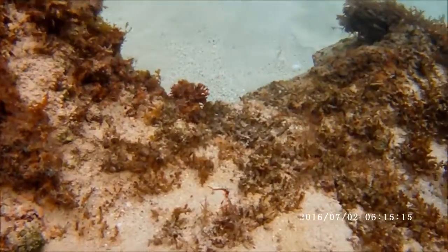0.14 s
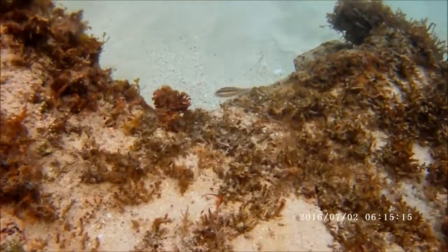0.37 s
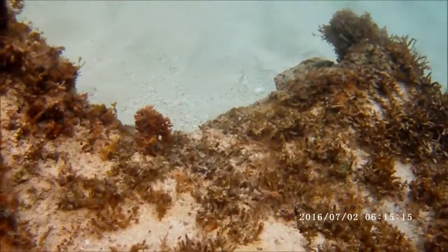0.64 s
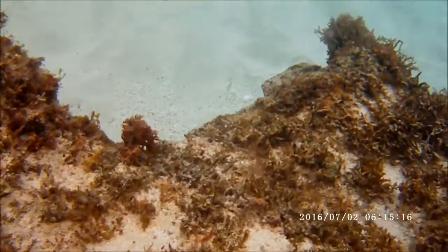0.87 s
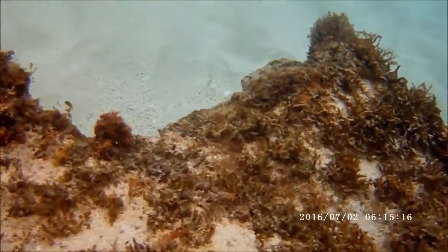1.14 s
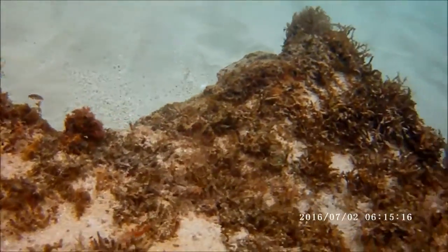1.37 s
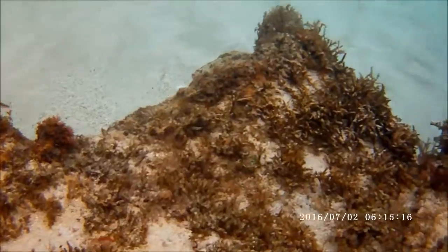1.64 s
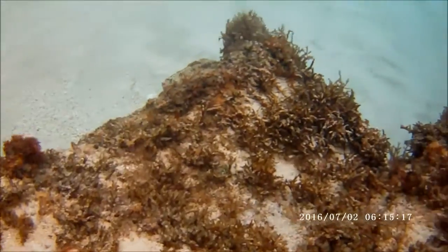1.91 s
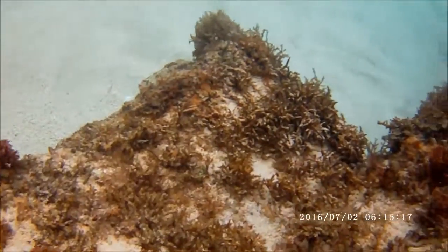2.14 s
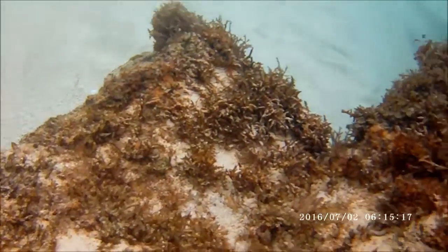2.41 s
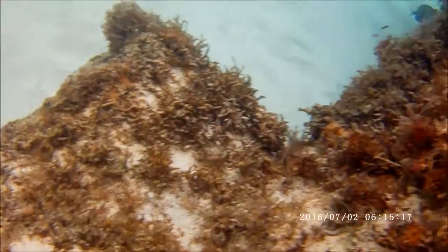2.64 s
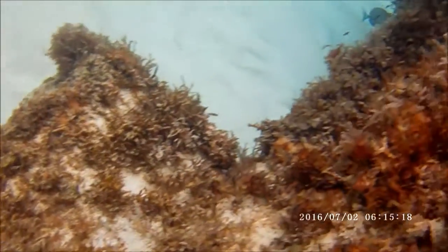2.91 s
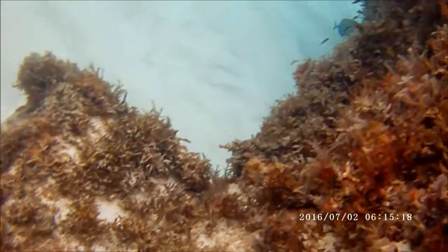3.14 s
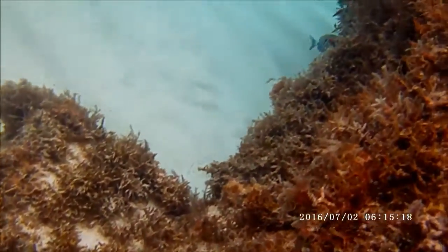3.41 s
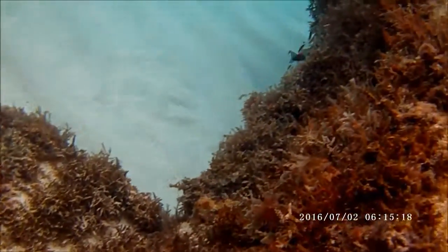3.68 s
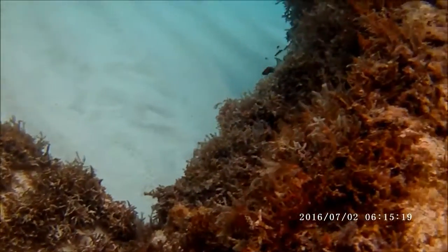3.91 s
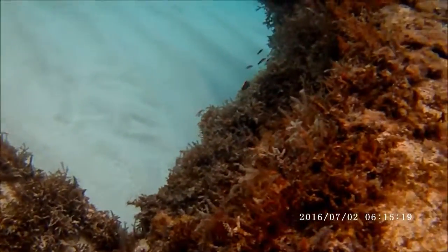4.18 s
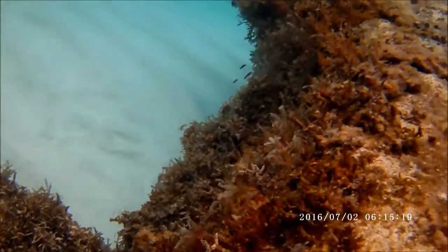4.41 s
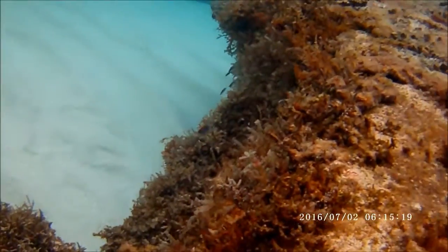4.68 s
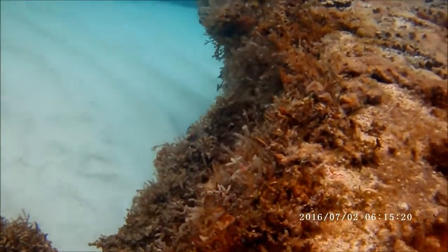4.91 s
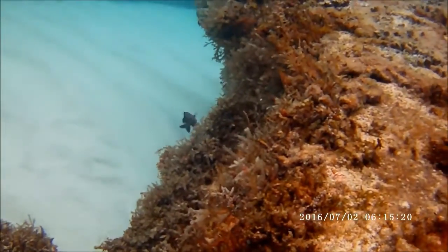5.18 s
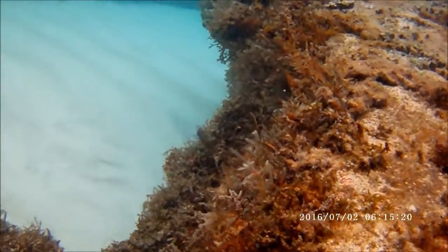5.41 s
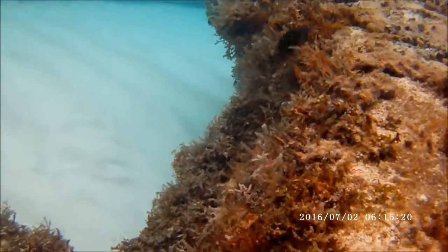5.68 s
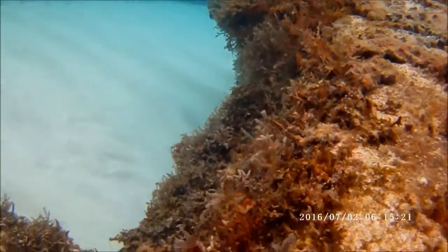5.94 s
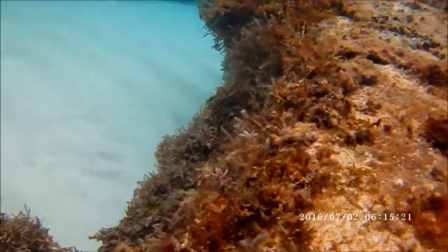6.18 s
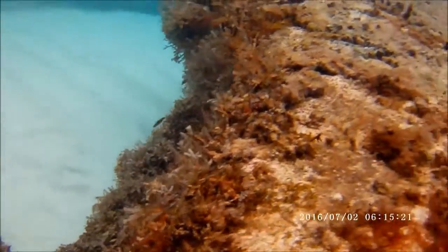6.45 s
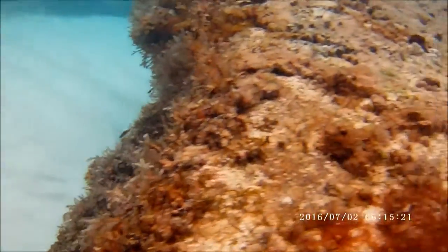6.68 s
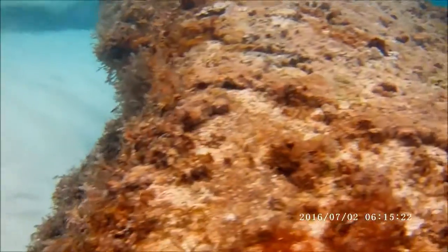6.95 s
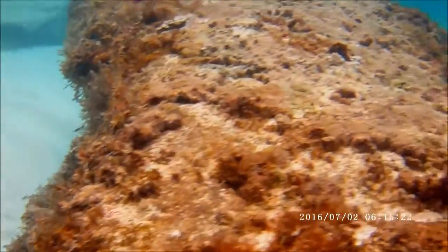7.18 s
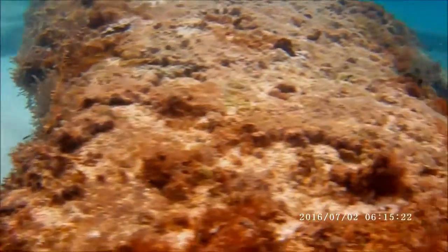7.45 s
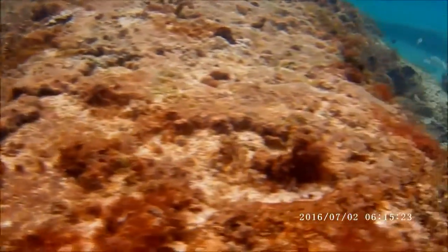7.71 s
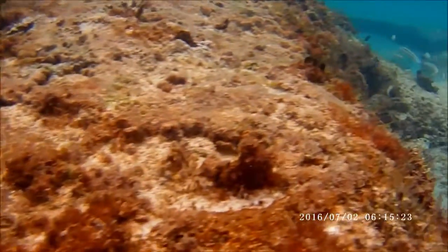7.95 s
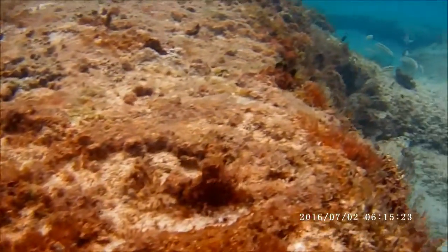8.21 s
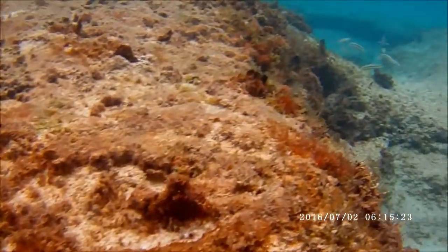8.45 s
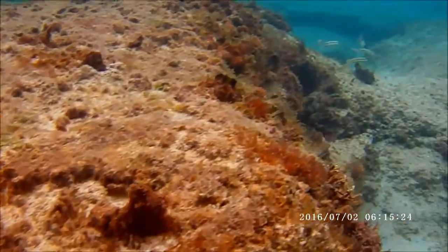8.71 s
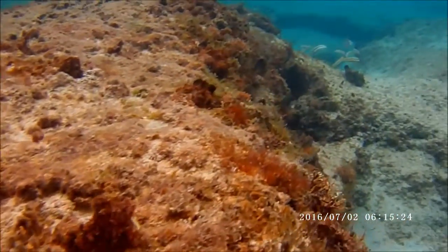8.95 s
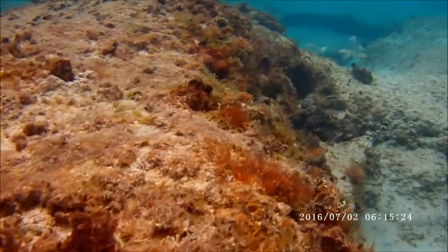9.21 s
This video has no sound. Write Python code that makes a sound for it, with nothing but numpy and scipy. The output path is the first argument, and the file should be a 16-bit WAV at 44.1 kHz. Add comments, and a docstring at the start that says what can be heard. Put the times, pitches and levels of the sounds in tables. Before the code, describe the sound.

Heard from inside a sealed plastic camera housing on a shallow reef. From 0 s there is a faint grainy hum, fine distant crackle and soft smooth hiss; the hum sinks after about 1 s and later returns in weak swells. Irregular snapping shrimp give tiny sharp clicks, with clearer ones near 0.8, 0.9 and 1.2 s, then a sparser stretch. A ringing snap comes at 2.75 s, a small double click at 3.1 s and a bright, hard crack at 4.07 s. At 5.4 s a very faint finger rub leads to the loudest hollow knock at 5.47 s, another at 5.6 s, a bright snap at 5.78 s, and smaller knocks at 5.9, 6.15 and 6.63 s, all dying almost instantly. From 7 s, thin ticks and light snaps scatter over the hiss, with a small cluster around 8.3 s and a crisp tick at 8.8 s, then quiet crackle to about 9.3 s.

```python
"""A grainy hum, a fine crackle and a soft hiss come first; sharp snaps and thin ticks soon stand out.
Snapping shrimp on a shallow reef are heard by a camera sealed in a plastic housing.
Each snap rings the housing: wall tones near 1.2 and 1.7 kHz, lid tones, a bright crack near 6 kHz.
Far snaps blur into the crackle; a hand rubs and knocks the case, and knocks ring the walls too.
The walls hum with grainy noise; preamplifier and water make the hiss, which is shaped random noise."""
import sys
import numpy as np
from scipy import signal
from scipy.fft import rfft, irfft
from scipy.io import wavfile

SR = 44100
rng = np.random.default_rng(int(sys.argv[2]) if len(sys.argv) > 2 else 0)


def how_loud(loudness_db):
    """Turn decibels into a plain amplitude multiplier (0 dB gives 1, 20 dB gives 10)."""
    steps = np.asarray(loudness_db, float) / 20
    return 10 ** steps


def master(y):
    """Save y as 16-bit WAV."""
    cut = np.clip(np.atleast_2d(y).T, -1, 1)
    pcm = np.round(cut * 32767)  # scale
    wavfile.write(sys.argv[1], SR, pcm.astype(np.int16))


N = 411892  # length of the scene in samples

# All source levels below hold ahead of the bass cuts.
# near snaps, and the upper ringing of knocks on the case, peak levels:
# (t/s, low wall level/dB, high wall level/dB, lid level/dB, crack level/dB)
SNAPS_AND_KNOCK_RINGING = [(0.0961, -53.5, -49, -45.5, -41), (0.1291, -49.5, -54, -42, -45),
                           (0.1852, -54, -45, -47, -46), (0.7615, -42, -36, -45.5, -42.5),
                           (0.779, -75, -51, -52, -55), (0.936, -49, -38, -44, -32),
                           (0.9697, -74, -56, -52, -55), (1.0299, -66, -49, -68, -61),
                           (1.1224, -78, -49, -49.5, -50), (1.132, -59, -46, -57, -60),
                           (1.2008, -40.5, -32, -31, -32), (1.2066, -46, -45, -49, -54),
                           (1.5272, -60, -53, -54.5, -51.5), (1.5922, -54, -40, -54, -47.5),
                           (1.6932, -56, -52, -75, -74), (1.7102, -55, -53, -44, -47.5),
                           (1.85, -68, -51, -62, -40), (2.0729, -57, -48.5, -66, -59),
                           (2.124, -57, -52.5, -70, -62), (2.1921, -52, -60, -79, -64),
                           (2.259, -58, -52.5, -61, -57), (2.7022, -44, -34, -46, -42.5),
                           (2.75, -32.5, -36, -28.5, -32.5), (3.095, -67, -65, -53, -57),
                           (3.1043, -37, -32.5, -54, -55), (3.1068, -39, -30, -47.5, -53),
                           (3.2175, -55, -52, -51, -47), (3.4218, -54.5, -58, -71, -58),
                           (3.5776, -54.5, -56, -56, -74), (3.6195, -58, -53, -49, -47),
                           (3.6341, -59, -52, -44.5, -39.5), (4.067, -31.5, -17.5, -29, -24),
                           (4.0717, -34, -31, -29, -29), (4.1085, -57, -55, -58, -58),
                           (4.1601, -46, -36, -45, -41.5), (4.441, -44, -47.5, -58, -62),
                           (4.5266, -70, -51.5, -72, -77), (4.5706, -55, -50, -68, -46.5),
                           (4.6262, -43.5, -46.5, -52.5, -53), (5.0574, -48.5, -51, -49.5, -61),
                           (5.0591, -54, -53.5, -62, -47.5), (5.4743, -12.5, -16, -30.5, -38),
                           (5.5299, -58, -53, -51, -47), (5.6038, -14, -28, -32.5, -34.5),
                           (5.7829, -37, -18.5, -29.5, -23.5), (5.8283, -45, -32, -42, -40),
                           (5.891, -30.5, -34.5, -44.5, -46.5), (5.895, -33, -49, -67, -52),
                           (6.049, -76, -51, -55, -48.5), (6.066, -58, -54, -56, -52.5),
                           (6.1453, -29.5, -37, -42.5, -42.5), (6.1818, -54, -58, -48.5, -50),
                           (6.1886, -49, -57, -70, -73), (6.5484, -46, -54, -38, -38.5),
                           (6.6291, -22, -27.5, -43, -48), (6.6712, -83, -52, -63, -48.5),
                           (6.8543, -62, -57.5, -55, -54), (7.228, -64.5, -59.5, -47, -42.5),
                           (7.6158, -56, -63, -50.5, -40.5), (7.7684, -49.5, -53, -48.5, -48),
                           (7.9906, -54.5, -58, -56, -53), (8.0452, -69, -55, -48.5, -45.5),
                           (8.1058, -55, -51.5, -73, -63), (8.2818, -43.5, -33, -45, -48),
                           (8.345, -57, -59, -63, -32.5), (8.3745, -58, -48, -79, -77),
                           (8.3905, -35, -43, -40.5, -55), (8.4506, -55, -47, -42.5, -35)]
# thin ticks, almost all crack: (t/s, crack peak level/dB)
THIN_TICKS = [(0.0617, -51), (0.161, -61), (0.2826, -48), (0.465, -54.5), (0.6263, -49), (0.8512, -54),
              (0.8622, -49), (1.007, -45.5), (1.643, -57), (1.76, -54.5), (1.8763, -49.5), (1.981, -54),
              (2.057, -52), (2.346, -54.5), (2.4398, -54), (2.566, -47), (2.9875, -51), (3.089, -46.5),
              (3.134, -46), (3.169, -49), (3.226, -56), (3.3125, -53), (3.6076, -46), (3.659, -49),
              (3.742, -51), (3.748, -52), (3.819, -50.5), (3.962, -51.5), (4.3058, -53), (4.48, -44),
              (4.5487, -47), (4.556, -53), (4.729, -50), (4.802, -52), (4.8645, -49), (4.9232, -53.5),
              (5.0504, -51), (5.0772, -46), (5.119, -51.5), (5.337, -54), (5.3551, -54), (5.3706, -57),
              (5.417, -42.5), (5.527, -47.5), (5.5637, -50.5), (5.6813, -53), (5.6927, -49.5),
              (5.7566, -53), (5.9116, -50), (6.0136, -55), (6.196, -57), (6.232, -54), (6.783, -49.5),
              (6.787, -53), (6.88, -52), (7.0708, -47), (7.2067, -47.5), (7.217, -53), (7.2796, -52),
              (7.311, -51.5), (7.514, -47), (7.609, -55), (7.6615, -44), (7.6972, -50.5), (7.7657, -42.5),
              (7.819, -51), (7.9545, -49), (8.1595, -52.5), (8.2409, -48.5), (8.3103, -51), (8.5264, -53),
              (8.5961, -44.5), (8.6785, -46), (8.7495, -53.5), (8.8024, -32), (8.918, -54.5), (8.958, -55),
              (8.9925, -42), (9.0663, -55), (9.1864, -52.5)]
# how a tick stirs low wall, high wall and lid, before scatter: (level/dB relative to its crack)
TICK_BODY = (-30, -25.5, -15)
# dull, low part of blows on the case: (t/s, peak level/dB)
CASE_KNOCKS = [(3.1049, -50), (3.1064, -35.5), (5.4756, -26), (5.6048, -24.5), (5.886, -48), (5.8922, -36),
               (5.8945, -38), (6.1456, -40), (6.186, -47), (6.188, -59), (6.6319, -47), (8.391, -51.5)]
# short jerks of a finger dragging on the case, at their strongest: (t/s, level/dB)
FINGER_JERKS = [(5.393, -56), (5.404, -55), (5.415, -59), (5.43, -56), (5.441, -61), (5.459, -60.5)]
# tones of each part of the housing, before any scatter or detuning:
# (f/Hz, relative level/dB, time to fade by 60 dB t/s)
LOW_WALL_TONES = [(1247.5, 1, 0.022), (1088, -8.5, 0.0089), (1440, -14, 0.037)]
HIGH_WALL_TONES = [(1723, -0.5, .018), (1465, -21.5, .03), (1750, -14.5, 0.0085)]
LID_TONES = [(1980, 8.5, 0.0084), (2282, -2.5, 0.018), (2530, -13, 0.014), (3080, -5, 0.017),
             (3435, -5.5, 0.012), (4046, -7.5, 0.01)]
PORT_TONES = [(4470, -11, 0.0049), (5130, -2.5, 0.0073), (5690, -1, 0.0059), (6174, 3, 0.0065),
              (7060, -2.5, 0.0062), (7830, -36, 0.0043), (8860, -27, 0.0024), (10300, -32.5, 0.0007),
              (11600, -29, 0.0029), (14900, -41, .002)]
CASE_TONES = [(423, -11, 0.028), (510, -0.5, 0.018), (624, -6, 0.018), (944, -1.5, 0.022),
              (1095, 5.5, 0.012)]
# slow course of the backgrounds, hum before its resting level is removed and the walls are weighted:
# (t/s, wall hum level/dB, far crackle level/dB)
BACKGROUND_LEVELS = [(0.0, -61.5, -69), (0.6, -62.5, -73.5), (1.22, -70, -76), (2.18, -72, -75.5),
                     (2.9, -68.5, -74.5), (3.66, -88, -74.5), (4.6, -67.5, -72.5), (4.9, -77, -75.5),
                     (5.33, -72, -73), (5.59, -63.5, -75), (5.85, -73, -72.5), (7.25, -72, -75),
                     (8.01, -67, -74), (8.3, -73, -74), (8.53, -66.5, -80), (8.87, -79, -75),
                     (9.34, -67, -77.5)]
# colour of the hiss: (f/Hz, relative level/dB)
HISS_COLOUR = [(25, -41.5), (97, -20.5), (341, -1), (1110, -1.5), (1260, -1.5), (1530, -3.5), (2110, -5.5),
               (3140, -8), (4110, -15), (5530, -18), (6250, -9.5), (7250, -18), (9050, -29), (10000, -40),
               (16000, -34.5)]

RING_TIME = np.arange(2048) / SR  # time axis of one ring, s


def level(x, db):
    """Scale a sound to an rms level in dB."""
    return x * how_loud(db) / np.sqrt(np.mean(x ** 2))


def curve(table, index):
    """Join one column of a table by straight lines in time."""
    table = np.array(table)
    return np.interp(np.arange(N) / SR, table[:, 0], table[:, index])


def bass_cut(x, hz):
    """Weaken everything below a frequency, ever more steeply."""
    return signal.sosfilt(signal.butter(4, hz, "high", fs=SR, output="sos"), x)


def rings(tones, count, rise_s, scatter_db, twist, detune):
    """One ring a blow, peak 1: fading tones, each weighted and shifted at random from blow to blow."""
    out = np.zeros((count, len(RING_TIME)))
    chance = rng.standard_normal((count, len(tones), 3))
    for k, (hz, db, t60) in enumerate(tones):
        gain, turn, bend = (chance[:, k, j, None] for j in range(3))
        fade = np.exp(-np.log(1000) * RING_TIME / t60)
        phase = 2 * np.pi * hz * (1 + detune * bend) * RING_TIME + twist * turn
        out += how_loud(db + scatter_db * gain) * fade * np.sin(phase)
    out *= 1 - np.exp(-(RING_TIME / rise_s) ** 2)  # soft start
    return out / np.abs(out).max(axis=1, keepdims=True)


def add(track, times, dbs, shapes):
    """Lay each ring into the track at its time and level."""
    for s, db, shape in zip(times, dbs, shapes):
        i = int(s * SR)
        track[i:i + len(shape)] += how_loud(db) * shape


def cracks(count):
    """Bright ringing through the port, trailed by scattered echoes off rock and surface."""
    direct = rings(PORT_TONES, count, rise_s=0.0002, scatter_db=3, twist=0.9, detune=0.03)
    echo_shape = np.exp(-RING_TIME / 0.0047) * (1 - np.exp(-RING_TIME / 0.00081))
    echoes = how_loud(-23) * rng.standard_normal(direct.shape) * echo_shape
    size = 2 * len(RING_TIME)  # room for the whole convolution
    trail = irfft(rfft(direct, size) * rfft(echoes, size), size)[:, :len(RING_TIME)]
    return direct + trail * how_loud(-9)


def snaps_and_knock_ringing():
    """Snaps, ticks and upper knock ringing; stiff walls pass little below their lowest tone."""
    track = np.zeros(N + len(RING_TIME))
    tick_s, tick_db = np.transpose(THIN_TICKS)
    scatter = 5 * rng.standard_normal((len(THIN_TICKS), len(TICK_BODY)))  # dB
    body_db = tick_db[:, None] + np.array(TICK_BODY) + scatter
    ticks = np.column_stack([tick_s, body_db, tick_db])
    s, low_db, high_db, lid_db, crack_db = np.vstack([SNAPS_AND_KNOCK_RINGING, ticks]).T
    count = len(s)
    low = rings(LOW_WALL_TONES, count, rise_s=0.0011, scatter_db=2, twist=0.5, detune=0.006)
    high = rings(HIGH_WALL_TONES, count, rise_s=0.00094, scatter_db=2, twist=0.5, detune=0.006)
    lid = rings(LID_TONES, count, rise_s=0.0005, scatter_db=3, twist=1.5, detune=0.02)
    add(track, s, low_db, low)
    add(track, s, high_db, high)
    # in a snap the claw's jet pushes first, the bubble cracks shut a moment later
    crack_s = s + 0.00053
    add(track, crack_s, lid_db, lid)
    add(track, crack_s, crack_db, cracks(count))
    return bass_cut(track[:N], 900)


def knocks():
    """Blows on the case ring its lowest tones."""
    track = np.zeros(N + len(RING_TIME))
    s, db = np.transpose(CASE_KNOCKS)
    add(track, s, db, rings(CASE_TONES, len(s), rise_s=0.0014, scatter_db=2, twist=0.3, detune=0.03))
    return track[:N]


def shaken(tones):
    """Grainy noise, jumping in strength every few milliseconds, shakes one part of the housing."""
    ring = rings(tones, count=1, rise_s=0.0005, scatter_db=0, twist=0, detune=0)[0]
    jumps = np.repeat(rng.standard_normal(N // 128 + 1), 128)[:N]
    grain = how_loud(5 * jumps)
    return level(signal.fftconvolve(grain * rng.standard_normal(N), ring)[:N], 0)


def rub():
    """Each jerk of the finger swells, lets go and fades; it shakes the case and the low wall."""
    t = np.arange(N) / SR
    rise, fall = 2997, 2498  # dB per second
    force = np.zeros(N)
    for s, db in FINGER_JERKS:
        force += how_loud(db + np.minimum(rise * (t - s), fall * (s - t)))
    return force * (shaken(CASE_TONES) + how_loud(-4) * shaken(LOW_WALL_TONES))


def far_crackle():
    """Many distant shrimp snap at random moments, their sizes with a long tail of louder ones."""
    track = np.zeros(N + len(RING_TIME))
    when, size, pick, high, low = rng.random((3000, 5)).T  # one row a snap
    s = when * N / SR
    db = np.minimum(-4.3 * np.log(1 - size), 17)
    pick = (pick * 64).astype(int)  # each snap borrows one of 64 shapes
    high_rings = rings(HIGH_WALL_TONES, 64, rise_s=0.00027, scatter_db=5.5, twist=0.37, detune=0.01)
    low_rings = rings(LOW_WALL_TONES, 64, rise_s=0.001, scatter_db=6, twist=0.75, detune=0.012)
    add(track, s, db, cracks(64)[pick])
    add(track, s, db - 2 - 14 * high, high_rings[pick])
    add(track, s, db - 3 - 14 * low, low_rings[pick])
    return level(track[:N], 0) * how_loud(curve(BACKGROUND_LEVELS, index=2))


def wall_hum():
    """Both walls hum; only what rises above the resting level is heard over the hiss."""
    resting = how_loud(-72.5) ** 2
    power = np.maximum(how_loud(curve(BACKGROUND_LEVELS, index=1)) ** 2 - resting, 0)
    walls = how_loud(-7.5) * shaken(LOW_WALL_TONES) + how_loud(-6) * shaken(HIGH_WALL_TONES)
    return np.sqrt(power) * walls


def hiss():
    """Smooth preamplifier and water noise: random noise shaped in frequency."""
    hz, db = np.transpose(HISS_COLOUR)
    bins = np.maximum(np.arange(N // 2 + 1) * SR / N, 1)  # Hz
    colour = how_loud(np.interp(np.log(bins), np.log(hz), db))
    return level(irfft(rfft(rng.standard_normal(N)) * colour, N), -69.5)


def scene():
    """The microphone capsule cuts the bass of all it hears; the hiss joins after it."""
    heard = snaps_and_knock_ringing() + knocks() + rub() + far_crackle() + wall_hum()
    return (bass_cut(heard, 290) + hiss())[None]


def low_pass(x):
    """Removes everything above the highest recorded frequency."""
    return signal.sosfilt(signal.butter(12, 15700, fs=SR, output="sos"), x)


def record(dry):
    """The camera stores the finished mix."""
    return low_pass(dry)


dry = scene()
out = record(dry)
master(out)
```